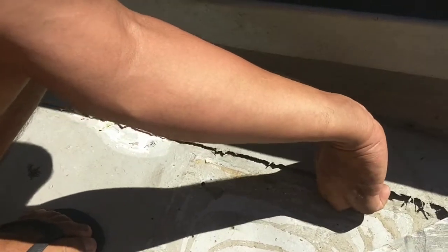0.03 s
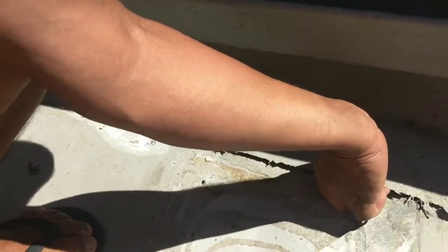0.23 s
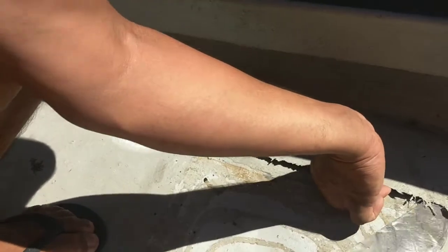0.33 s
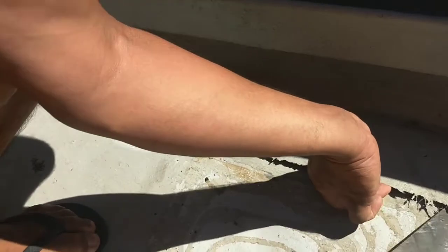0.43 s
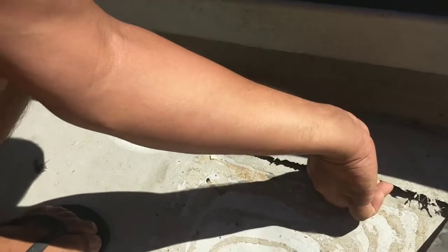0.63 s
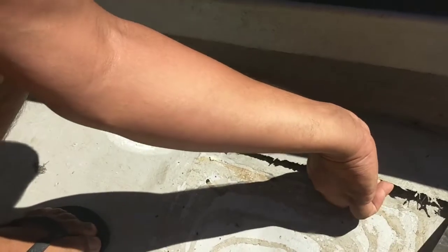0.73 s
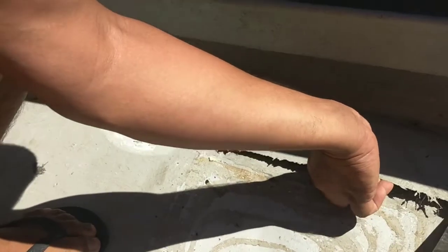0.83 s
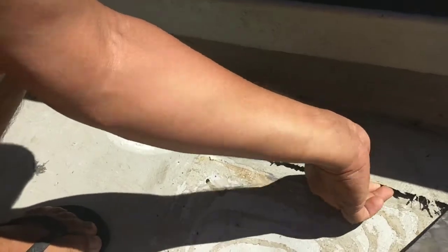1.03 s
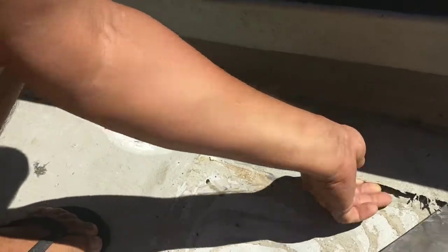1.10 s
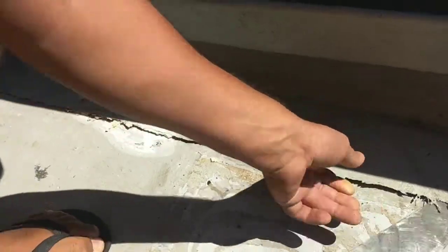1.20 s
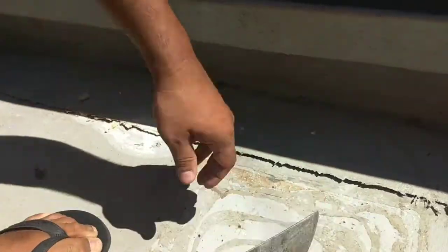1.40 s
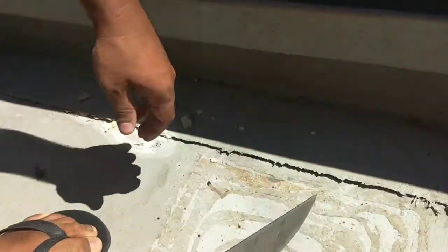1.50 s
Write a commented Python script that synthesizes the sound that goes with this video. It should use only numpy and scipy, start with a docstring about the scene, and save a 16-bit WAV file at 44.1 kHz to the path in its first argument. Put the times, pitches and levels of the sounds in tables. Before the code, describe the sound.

A scraper crunches over a worn floor in short, uneven strokes, snapping off small flakes.

```python
"""Gritty scrapes, close by: a hand works a scraper over a worn, flaking floor outdoors.
Each stroke crushes grit and makes the scraper stick and slip; it judders in the hardest push
and creaks as it eases off. Flakes snap away and the skidding edge zings,
over a soft wash of outdoor air."""
import sys
import numpy as np
from scipy import signal
from scipy.fft import rfft, irfft
from scipy.io import wavfile

SR = 44100
rng = np.random.default_rng(int(sys.argv[2]) if len(sys.argv) > 2 else 0)


def dump(signal):
    """Clip the signal to [-1, 1] and save it as 16-bit WAV at the path in sys.argv[1]."""
    limited = np.clip(np.atleast_2d(signal).T, -1, 1)
    pcm = np.round(limited * 32767).astype(np.int16)
    wavfile.write(sys.argv[1], SR, pcm)


N = 68355

# hand strokes: (full pressure at [s], rise [s/20 dB], hold [s], fall [s/20 dB],
#                grit [dB], rasp [dB], thrum [dB])
HAND_STROKES = [(0.122, 0.072, 0.028, 0.044, -51, -85, -58), (0.242, 0.092, 0.014, 0.069, -39, -52, -42),
                (0.288, 0.061, 0.014, 0.02, -32.5, -45.5, -37),
                (0.303, 0.012, 0.015, 0.069, -34, -43, -40.5), (0.396, 0.021, 0.012, 0.02, -49, -59, -49.5),
                (0.412, 0.011, 0.01, 0.011, -34.5, -67, -43), (0.44, 0.024, 0.043, 0.017, -29, -35.5, -35),
                (0.497, 0.055, 0.031, 0.075, -41.5, -49.5, -37),
                (0.59, 0.046, 0.072, 0.19, -44.5, -52, -42.5),
                (0.878, 0.051, 0.016, 0.076, -42.5, -50.5, -71), (0.95, 0.65, 0.071, 0.11, -56, -52.5, -51),
                (1.067, 0.062, 0.092, 0.13, -43.5, -51.5, -47),
                (1.238, 0.087, 0.064, 0.016, -35.5, -43, -37),
                (1.313, 0.033, 0.0068, 0.024, -26, -33.5, -32.5),
                (1.33, 0.016, 0.0052, 0.0075, -33.5, -31.5, -34),
                (1.337, 0.01, 0.0053, 0.021, -35, -60, -58),
                (1.362, 0.038, 0.018, 0.057, -46, -51.5, -47.5), (1.413, 0.014, 0.01, 0.13, -43, -52, -46),
                (1.538, 0.068, 0.028, .05, -51.5, -52.5, -64)]
# stick-slip runs: (start [s], length [s], first rate [slips/s], last rate [slips/s],
#                   level [dB], change over run [dB], ring [Hz])
SLIP_RUNS = [(.224, 0.041, 234, 180, -45.5, -11, 236), (.273, 0.024, 128, 340, -35, -19, 200),
             (.318, 0.039, 235, 143, -35.5, -1.5, 222), (.426, 0.036, 191, 205, -28, 2, 367),
             (.464, 0.0177, 356, 450, -23.5, -10, 417), (.445, 0.038, 228, 180, -35, -5, 238),
             (.484, 0.033, 146, 162, -37, -5, 159), (.505, 0.045, 182, 210, -43.5, -11.5, 380),
             (.545, 0.061, 165, 130, -46.5, -4, 149), (.665, 0.055, 160, 170, -48, -18, 164),
             (1.264, 0.023, 190, 219, -34.5, 28, 347), (1.304, 0.043, 213, 194, -35.5, -21, 187),
             (1.39, 0.071, 218, 227, -42.5, -5, 256), (1.459, 0.068, 125, 38, -41.5, 0.5, 178)]
# breaking flakes: (time [s], rise [s], decay [s], level [dB], pitch [Hz])
FLAKE_SNAPS = [(0.236, 0.00091, 0.0041, -45.5, 5500), (.278, 0.0013, 0.0051, -38, 5200),
               (0.445, 0.002, 0.0045, -29, 6800), (0.447, 0.00067, 0.0027, -23.5, 13800),
               (0.4645, 0.0025, 0.014, -29, 802), (0.4714, .001, 0.0021, -30.5, 5800),
               (0.8882, 0.000068, 0.0041, -30.5, 13500), (0.8904, .001, 0.01, -42.5, 2850),
               (1.3179, 0.00067, 0.0021, -22, 3700), (1.3309, 0.009, 0.0089, -27.5, 2000),
               (1.3358, 0.00016, 0.0016, -20, 13200)]
# edge skids: (peak time [s], length [s], level [dB], pitch [Hz])
EDGE_ZINGS = [(0.301, 0.042, -39, 2910), (0.306, 0.03, -40.5, 9650), (0.307, 0.031, -40, 1010),
              (0.434, 0.015, -32, 938), (0.45, 0.039, -33, 4530), (0.466, 0.043, -53, 13300),
              (1.001, 0.037, -52.5, 3930), (1.373, 0.075, -55, 1287), (1.374, 0.019, -49, 9500)]
# scraper resonances, low, middle and bright: (centre [Hz], width [Hz], gain [dB])
BODY_MODES = [(89, 116, -9), (159.6, 30, -1.5), (220, 130, -6), (351, 21.7, -5.5), (377, 6.6, 3.5),
              (455, 9, -52)]
KNOCK_MODES = [(613, 12, -1), (727, 13, 2), (830, 8.4, -5), (970, 7.6, -32), (1040, 19, 5),
               (1230, 17, -0.5), (1500, 8.3, 10)]
BLADE_MODES = [(1735, 220, 6.5), (2750, 29, 13.5), (2903, 45, 4.5), (3310, 60, -10.5), (3724, 13, 9),
               (4130, 91, -21), (6860, 81, 0), (9600, 100, 3), (13340, 320, 11), (14900, 150, 8)]
# spectra of grit, edge catches and air: (frequency [Hz], density [dB])
GRIT_SPECTRUM = [(900, -12), (1700, -3), (2700, 3), (4000, 1), (5500, 0), (8700, -4.5), (11500, 1.5),
                 (13500, 2), (15500, 3.5)]
RASP_SPECTRUM = [(40, -75), (150, -18), (400, -1), (600, -1.5), (800, 5.5), (1250, 0.5), (1550, -6),
                 (2000, -34), (3500, -22.5)]
AIR_SPECTRUM = [(25, -22), (65, 5.5), (140, 11.5), (380, 7.5), (600, 3), (1200, 0), (2000, -8.5),
                (4000, -8.5), (8000, -21), (15000, -8.5)]

GRAINS_PER_S, GRAIN_SPREAD_DB = 5400, 2.5
CRUMBS_PER_S, CRUMB_DB, CRUMB_SPREAD_DB = 96, 7.5, 3
CHIP_HITS_PER_S, CHIP_WIDTH_HZ, CHIP_DB, CHIP_RANGE_HZ = 18, 49, -5, (2583, 15400)
CATCHES_PER_S, CATCH_SPREAD_DB = 1200, 2
UNEVEN_DB, UNEVEN_PER_S = 0.6, 130
SLIP_JITTER, SLIP_SPREAD_DB, SLIP_RASP_DB = 0.046, 3, -14.5
SLIP_WIDTH_HZ, JUDDER_HIGHPASS_HZ = 71, 115
SNAP_WIDTH_RATIO, CRACK_DECAY_S, SNAP_GRIT_DB = 0.11, 0.00013, -2.5
ZING_WIDTH_RATIO = 0.046
AIR_DB = -53.5
FLIP_HZ, LEFT_LAG_S, TREBLE_PAN_DB, LOWPASS_HZ = 1250, 20 / SR, -2, 15800


def scrape(t):
    """Hand pressure rises, holds and falls on uneven ground, driving grit, rasp and thrum."""
    power = 0
    for at_s, rise_s, hold_s, fall_s, *levels_db in HAND_STROKES:
        shape_db = -20 * (np.maximum(at_s - t, 0) / rise_s + np.maximum(t - at_s - hold_s, 0) / fall_s)
        power = power + undb(np.array(levels_db)[:, None] + shape_db) ** 2
    grit_gain, rasp_gain, thrum_gain = np.sqrt(power) * undb(UNEVEN_DB * wander(UNEVEN_PER_S))
    return (grit_gain * stereo(grit, width=0.35)
            + rasp_gain * stereo(rasp, width=0.7)
            + thrum_gain * stereo(thrum, width=0.77))


def grit():
    """Grains and larger crumbs crack and ring the blade; loose chips ring at their own pitches."""
    cracks = clicks(GRAINS_PER_S, GRAIN_SPREAD_DB)
    cracks += undb(CRUMB_DB) * clicks(CRUMBS_PER_S, CRUMB_SPREAD_DB)
    crunch = colour(cracks, GRIT_SPECTRUM) + resonate(cracks, BLADE_MODES)
    chips = sum(ring(clicks(CHIP_HITS_PER_S, CRUMB_SPREAD_DB), hz, CHIP_WIDTH_HZ)
                for hz in rng.uniform(*CHIP_RANGE_HZ, size=40))
    return unit(crunch) + undb(CHIP_DB) * unit(colour(chips, GRIT_SPECTRUM))


def rasp():
    """The edge catches on coarser bumps, which knock in the scraper."""
    catches = clicks(CATCHES_PER_S, CATCH_SPREAD_DB)
    return colour(catches, RASP_SPECTRUM) + resonate(catches, KNOCK_MODES)


def thrum():
    """Edge catches shake the scraper's low resonances."""
    shake = resonate(clicks(CATCHES_PER_S, CATCH_SPREAD_DB), BODY_MODES)
    return signal.sosfilt(signal.butter(2, [70, 650], "band", fs=SR, output="sos"), shake)


def judders():
    """Runs of nearly regular slips, each ringing the scraper."""
    out = np.zeros(N)
    for start_s, length_s, first_per_s, last_per_s, db, change_db, hz in SLIP_RUNS:
        slips, slip_s = np.zeros(N), start_s
        for late, size in rng.standard_normal((40, 2)):
            progress = (slip_s - start_s) / length_s
            if progress < 1 and slip_s * SR < N - 1:
                slips[int(slip_s * SR)] = undb(change_db * progress + SLIP_SPREAD_DB * size)
                slips_per_s = first_per_s + (last_per_s - first_per_s) * progress
                slip_s += (1 + SLIP_JITTER * late) / slips_per_s
        body = unit(ring(ring(slips, hz, SLIP_WIDTH_HZ), hz, 4 * SLIP_WIDTH_HZ))
        scratch = undb(SLIP_RASP_DB) * unit(colour(slips, RASP_SPECTRUM))
        gain = undb(db) * np.sqrt(length_s * SR / N)  # rms over the run's length
        out += gain * (body + scratch)
    return signal.sosfilt(signal.butter(3, JUDDER_HIGHPASS_HZ, "high", fs=SR, output="sos"), out)


def snaps(t):
    """A flake strains, cracks and crumbles within milliseconds, with a ring of its own."""
    out = np.zeros(N)
    for at_s, rise_s, decay_s, db, hz in FLAKE_SNAPS:
        age_s = np.maximum(t - at_s, 0)
        strain = np.exp(np.minimum(t - at_s, 0) / rise_s)
        release = np.exp(-age_s / decay_s) + np.exp(-age_s / CRACK_DECAY_S)
        burst = strain * release * np.sign(rng.standard_normal(N))
        ping = unit(ring(burst, hz, SNAP_WIDTH_RATIO * hz))
        crunch = undb(SNAP_GRIT_DB) * unit(colour(burst, GRIT_SPECTRUM))
        gain = undb(db) * np.sqrt((rise_s + decay_s) / 2 * SR / N)
        out += gain * (ping + crunch)
    return out


def zings(t):
    """The edge skids and sings briefly at one pitch."""
    out = np.zeros(N)
    for peak_s, length_s, db, hz in EDGE_ZINGS:
        width_hz = ZING_WIDTH_RATIO * hz
        tone = ring(ring(rng.standard_normal(N), hz, width_hz), hz, width_hz)
        swell = np.exp(-(2 * (t - peak_s) / length_s) ** 2)
        out += undb(db) * swell * unit(tone)
    return out


def air():
    """Soft, steady outdoor wash."""
    return undb(AIR_DB) * stereo(lambda: colour(rng.standard_normal(N), AIR_SPECTRUM), width=0.26)


def clicks(per_s, spread_db):
    """Random impulses of uneven size and sign."""
    size = undb(spread_db * np.clip(rng.standard_normal(N), -2.6, 2.6))
    return (rng.random(N) < per_s / SR) * size * np.sign(rng.standard_normal(N))


def wander(per_s):
    """Linearly joined random values, spread near 1."""
    return np.interp(np.arange(N) * per_s / SR, np.arange(2000), rng.standard_normal(2000))


def ring(x, hz, width_hz):
    """One resonance, gain 1 at its centre."""
    return signal.lfilter(*signal.iirpeak(min(hz, SR / 2 - 1), hz / width_hz, fs=SR), x)


def resonate(x, modes):
    """Parallel resonances."""
    return sum(undb(db) * ring(x, hz, width_hz) for hz, width_hz, db in modes)


def colour(x, spectrum):
    """Minimum-phase filter through (frequency [Hz], gain [dB]) points."""
    hz, db = np.array(spectrum, float).T
    bins_hz = np.maximum(np.fft.rfftfreq(4096, 1 / SR), 1)
    gain = undb(np.interp(np.log(bins_hz), np.log(hz), db))
    cepstrum = irfft(np.log(gain))
    causal_fold = np.r_[1, np.full(2047, 2), 1, np.zeros(2047)]
    impulse_response = irfft(np.exp(rfft(cepstrum * causal_fold)))
    return signal.fftconvolve(x, impulse_response)[:N]


def stereo(source, width):
    """Independent mid and side draws; width is side rms over mid rms."""
    mid, side = unit(source()), unit(source())
    return unit(mid + width * side * np.array([[1], [-1]]))


def undb(db):
    """Decibels to gain."""
    return 10 ** (np.asarray(db) / 20)


def unit(x):
    """Scale to rms 1."""
    return x / np.sqrt(np.mean(x ** 2) + 1e-20)


def scene():
    """Strokes, judders, snaps and zings over outdoor air."""
    t = np.arange(N) / SR
    return scrape(t) + judders() + snaps(t) + zings(t) + air()


def record(dry):
    """Phone: bass centred; left treble late, weaker and inverted; top cut."""
    hz = np.fft.rfftfreq(2 * N, 1 / SR)
    treble = 0.5 + 0.5 * np.tanh((hz - FLIP_HZ) / 90)
    pan = undb(TREBLE_PAN_DB * np.minimum(hz / 9000, 1) / 2)
    left_phase = np.exp(1j * treble * (np.pi - 2 * np.pi * hz * LEFT_LAG_S))
    wide = irfft(rfft(dry, 2 * N) * np.array([pan * left_phase, 1 / pan]))[:, :N]
    return signal.sosfilt(signal.ellip(10, 0.2, 80, LOWPASS_HZ, fs=SR, output="sos"), wide)


dry = scene()
out = record(dry)
dump(out)
```